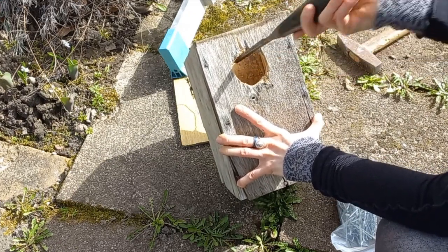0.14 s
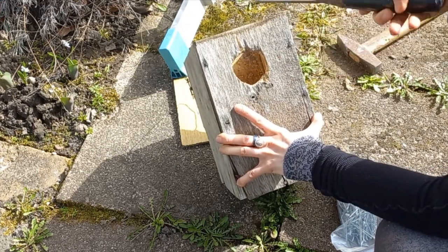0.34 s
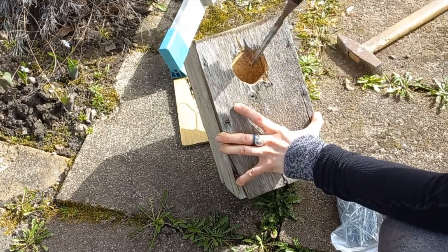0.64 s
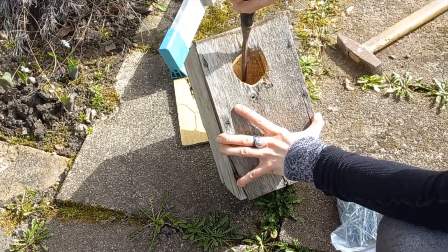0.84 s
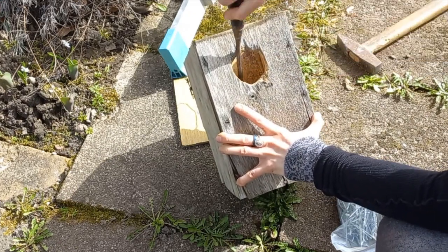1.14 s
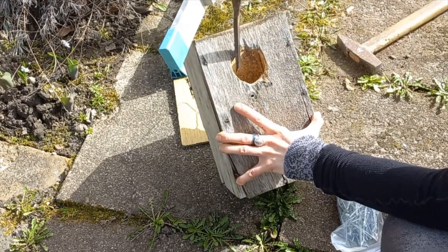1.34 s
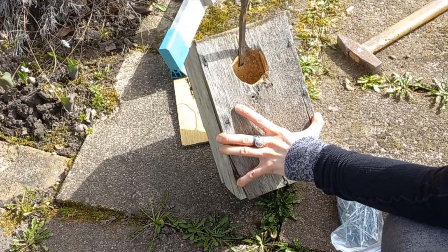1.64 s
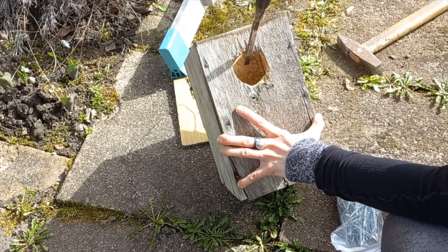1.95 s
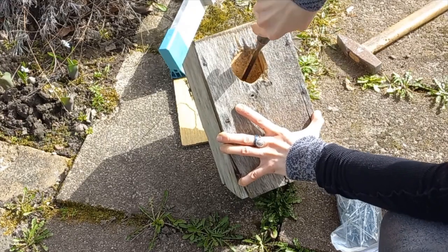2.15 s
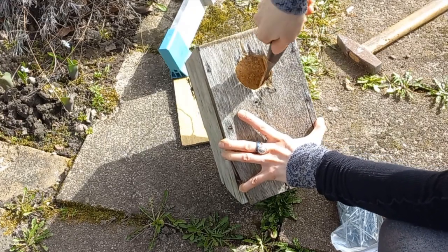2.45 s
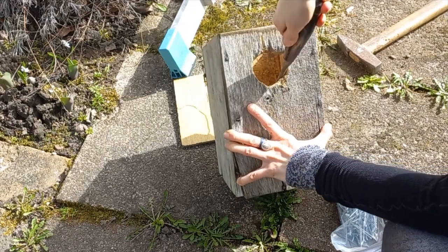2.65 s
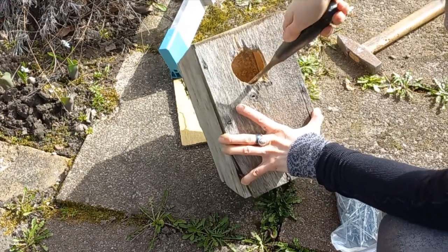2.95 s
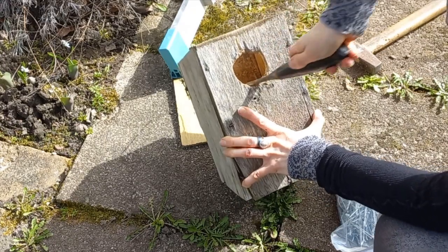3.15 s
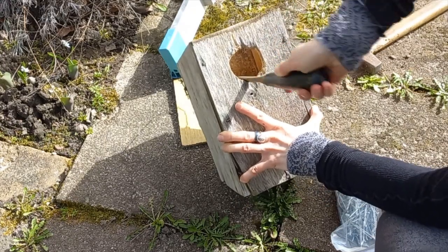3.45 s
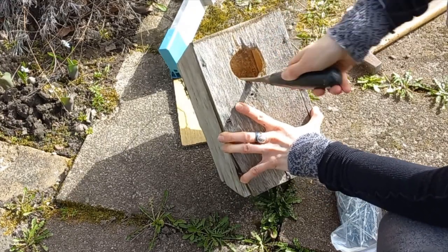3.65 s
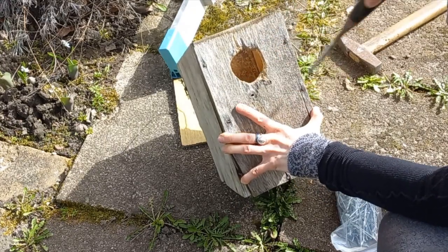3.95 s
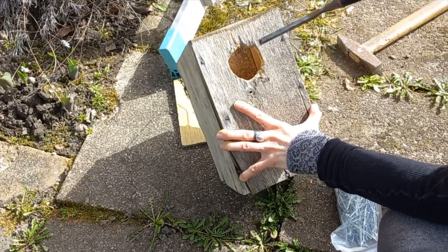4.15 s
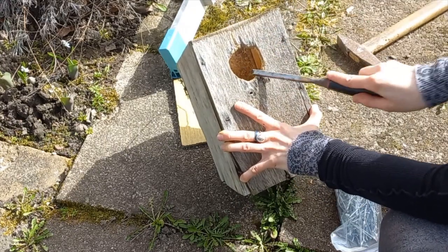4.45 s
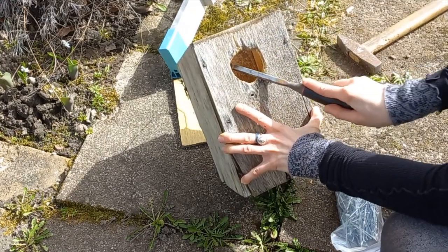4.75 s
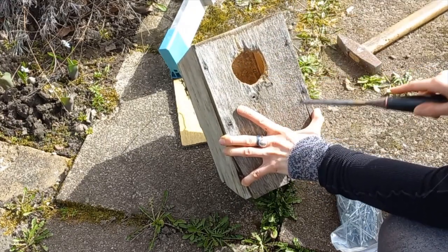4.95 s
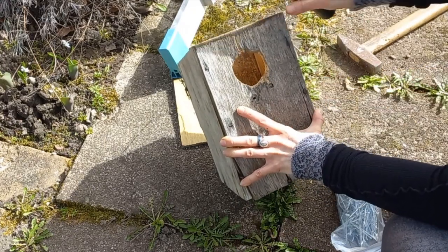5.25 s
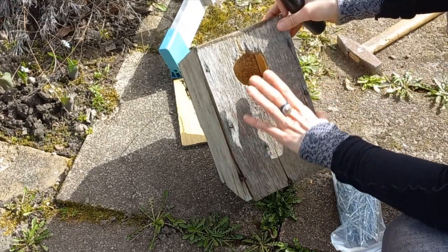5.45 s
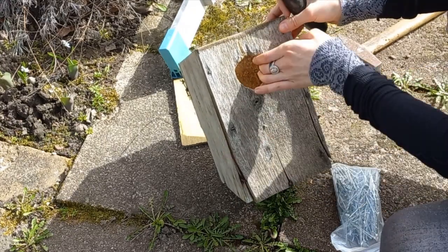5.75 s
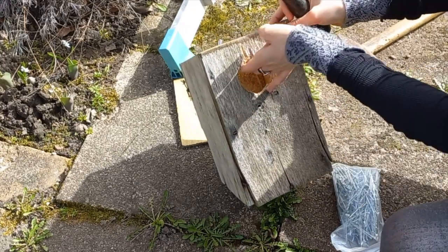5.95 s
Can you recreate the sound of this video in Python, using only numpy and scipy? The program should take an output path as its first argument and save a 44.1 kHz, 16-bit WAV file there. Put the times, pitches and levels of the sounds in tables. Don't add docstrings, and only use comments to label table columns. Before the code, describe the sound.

Close up, a metal file scrapes around the hole of a hollow wooden box in rapid, uneven strokes, each a gritty rasp over a low woody resonance. Wind buffets the microphone early on while small birds chirp in the distance. Hard knocks and splinter cracks cluster just before three seconds. After a short gap, lighter strokes follow, then a double knock near five seconds, and finally faint finger rubs and a dry tick in quiet garden air.

```python
import sys
import numpy as np
from scipy import signal
from scipy.fft import rfft, irfft, next_fast_len
from scipy.io import wavfile
from scipy.ndimage import uniform_filter1d

SR = 44100
rng = np.random.default_rng(int(sys.argv[2]) if len(sys.argv) > 2 else 0)


def unload_audio(sound):
    columns = np.transpose(np.atleast_2d(sound))
    steps = np.round(np.clip(columns, -1, 1) * 32767)
    wavfile.write(sys.argv[1], SR, steps.astype(np.int16))


def gain_from_db(level_db):
    decades = np.asarray(level_db, float) / 20
    return 10 ** decades


N = 268613
PADDED = next_fast_len(N)
FREQS = np.maximum(np.fft.rfftfreq(PADDED, 1 / SR), 1)

# start_s, length_s, hiss_db, boom_db, panel_db
STROKES = [(-.01, 0.13, -55.5, -28, -43.5), (0.057, 0.17, -62, -38, -45), (0.2, 0.09, -73, -58, -69),
           (0.215, 0.51, -84.5, -57.5, -96.5), (0.613, 0.092, -71.5, -50, -69),
           (0.787, 0.17, -63.5, -32.5, -48.5), (1.006, 0.14, -57.5, -52, -54.5),
           (1.175, 0.14, -65, -54, -59.5), (1.328, 0.16, -57.5, -38.5, -53.5),
           (1.485, 0.15, -59.5, -39, -44), (1.653, 0.15, -58, -26.5, -38.5),
           (1.8, 0.15, -58, -32.5, -40), (2.006, 0.12, -61.5, -30, -42), (2.134, 0.16, -62, -36.5, -52),
           (2.312, 0.16, -61, -34.5, -42.5), (2.469, 0.032, -65, -46.5, -50.5),
           (2.5, 0.072, -78.5, -62.5, -69),
           (2.642, 0.12, -59, -44, -48), (2.73, 0.16, -55, -27, -34), (2.898, 0.076, -71.5, -53, -63),
                (2.961, 0.1, -60, -52, -44.5), (3.063, 0.16, -54.5, -42, -42.5),
                (3.252, 0.12, -61.5, -48, -54), (3.337, 0.04, -53.5, -40, -40.5),
                (3.383, 0.14, -54.5, -37.5, -36.5), (3.55, 0.15, -53.5, -41, -38),
                (3.712, 0.064, -54.5, -43.5, -40), (3.763, 0.092, -59.5, -45.5, -40),
                (3.834, 0.077, -57, -39.5, -39.5), (4.267, 0.07, -66.5, -52, -48.5),
                (4.326, 0.087, -67.5, -54, -54), (4.423, 0.1, -60.5, -42.5, -43),
                (4.543, 0.13, -60, -47, -54), (4.679, 0.1, -59, -42, -45.5),
                (4.808, 0.14, -56.5, -38.5, -43)]
# start_s, length_s, hiss_db, boom_db, panel_db
BRUSHES = [
    (5.333, 0.071, -85, -78.5, -74),
    (5.545, .03, -72.5, -70, -83.5),
    (5.574, 0.16, -76, -92, -78),
    (5.769, 0.2, -84, -98.5, -89),
]
# freq_hz, level_db, t60_s,
# shape_db (gained as the contact moves round the hole)
BOX_MODES = [(221, -18, 0.3, 6.5), (333, -26, 0.12, -7), (326, -8, 0.15, -3), (375, 4, 0.047, 4),
             (394.4, -11.5, 0.26, 9), (431.2, -3.5, 0.12, -0.5), (505, -9, 0.051, 1.5),
             (509, -12.5, 0.093, 0.5)]
PANEL_MODES = [(700, -3, 0.082, -7.5), (858.6, 5, 0.048, -6), (977.5, 3, 0.061, 1.5),
               (1032, 0.5, 0.018, 14.5), (1207, -5.5, 0.018, 6), (1396, -3.5, 0.088, 6),
               (1526, -11, 0.087, 3), (1631, 0.5, 0.027, 2.5), (1813, -15.5, 0.03, 15),
               (1920, -7.5, 0.0081, 15), (2114, -16, 0.016, 15)]
BLADE_MODES = [(2710, 2, 0.005, 5), (2840, 2, 0.032, 6), (3557, -6.5, .02, -20), (4150, 6.5, 0.012, -14),
               (5050, 3, 0.06, -4), (5245, 8, 0.045, -3), (5170, -10, 0.011, 5.5), (6600, -22, 0.03, 1),
               (7760, -9, .011, -0.5), (12000, -3.5, 0.00074, 6.5), (14930, -13, 0.009, -3)]
# freq_hz, density_db (per Hz)
TEETH_SPECTRUM = [(1180, -60.5), (2000, -6.5), (2340, -7), (2780, -2), (3740, 7), (5250, 2.5), (5780, 3.5),
                  (11900, -2.5), (16000, -6.5)]
STROKE_SHAPE = 0.43, 1.87
HISS_SHAPE = 0.62, 3.6
HISS_ENDS_DB, BOOM_ENDS_DB, PANEL_ENDS_DB, BLADE_ENDS_DB = 15, 15.5, 20, 23
BLADE_FROM_PANEL, BLADE_DB = 0.43, -8
LINGER_DB, LINGER_T60_S = -18.5, 1
TRAIL_DB, TRAIL_T60_S = -17.5, 0.2
GRAIN_HZ, GRAIN_DB = (700, 2700), -11
SPARKLE_HZ = 6950


def strokes():
    s, length, hiss_db, boom_db, panel_db = np.transpose(STROKES + BRUSHES)
    blade_db = BLADE_DB + BLADE_FROM_PANEL * panel_db + (1 - BLADE_FROM_PANEL) * hiss_db

    boom = swells(zip(s, length, boom_db), BOOM_ENDS_DB, *STROKE_SHAPE)
    panel = swells(zip(s, length, panel_db), PANEL_ENDS_DB, *STROKE_SHAPE)
    blade = swells(zip(s, length, blade_db), BLADE_ENDS_DB, *HISS_SHAPE)
    hiss = swells(zip(s, length, hiss_db), HISS_ENDS_DB, *HISS_SHAPE)
    sparkle = swells(zip(s, length, hiss_db), HISS_ENDS_DB + 1.5, *HISS_SHAPE)
    boom = trailing(boom, LINGER_DB, LINGER_T60_S)
    levels = np.array([panel, blade, hiss, sparkle])
    panel, blade, hiss, sparkle = trailing(levels, TRAIL_DB, TRAIL_T60_S)

    coarse = bites(1500, spread_db=2.0)
    fine = bites(5000, spread_db=3.0) * gain_from_db(1.6 * drift(45))
    box_ring = evened(body(coarse, BOX_MODES[1:], wander_db=7.0), 0.053, 0.22)
    panel_ring = evened(body(coarse + 0.63 * fine, PANEL_MODES, wander_db=4.5), 0.053, 1.0)
    blade_ring = gain_from_db(3.5) * evened(body(fine, BLADE_MODES, wander_db=1.2), 0.2, 0.3)
    grain_band = signal.butter(2, GRAIN_HZ, "band", fs=SR, output="sos")
    grain = gain_from_db(GRAIN_DB) * rms_one(signal.sosfilt(grain_band, coarse + fine))

    teeth = gain_from_db(2.5) * patchy(coloured(fine, TEETH_SPECTRUM))
    treble = signal.butter(2, SPARKLE_HZ, "high", fs=SR, output="sos")
    top = signal.sosfiltfilt(treble, teeth)
    out = boom * box_ring + panel * (panel_ring + grain) + blade * blade_ring
    return out + hiss * (teeth - top) + sparkle * top


def bites(per_s, spread_db):
    sizes = gain_from_db(spread_db * np.minimum(rng.exponential(1, N), 4)) * rng.choice([-1, 1], N)
    return sizes * (rng.random(N) < per_s / SR)


def ring(clicks, hz, t60):
    t60 = min(t60, 110 / hz)
    radius = gain_from_db(-60 / (t60 * SR))
    angle = 2 * np.pi * hz / SR
    poles = [1, -2 * radius * np.cos(angle), radius * radius]
    return signal.lfilter([0, np.sin(angle)], poles, clicks + 1e-18)


def body(clicks, modes, wander_db):
    travel, where = [drift(2.71) for _ in range(4)], place()
    out = np.zeros(N)
    for k, (hz, db, t60, shape_db) in enumerate(modes):
        force = gain_from_db(db + shape_db * where + wander_db * travel[k % 4])
        out += (-1) ** k * ring(clicks * force, hz, t60)
    return out


# time_s, place (-1 to 1)
PLACE = [(0, -0.76), (.6, -0.18), (1.3, -0.38), (1.9, -0.61), (2.299, -0.17), (2.7, 0.68), (3.1, 0.68),
         (3.499, 0.81), (3.899, 0.68), (4.3, 0.37), (4.6, 0.69), (4.9, 0.59), (6.09, 0.55)]


def place():
    return np.interp(np.arange(N) / SR, *np.transpose(PLACE))


def patchy(x):
    edges = np.geomspace(1500, 18000, num=7)
    out = x.copy()
    for pair in zip(edges, edges[1:]):
        band = signal.lfilter(*signal.butter(1, pair, "band", fs=SR), x)
        out += 0.5 * band * drift(10)
    return rms_one(out)


# time_s, peak_db, thud_db, panel_db, upper_panel_db (shares)
KNOCKS = [(0.022, -16.5, -6, -22, -21), (0.209, -34, -32, 11, 11.5), (0.610, -15.5, -14, -19, -18.5),
          (0.796, -11, -20, -27, -19), (0.82, -11, -5.5, -1.5, 1), (0.85, -17.5, -1, -6, -17),
          (1.543, -17, 0, -9, -5), (1.846, -16.5, -15, -2.5, -9), (2.044, -13, -30, -3.5, 2),
          (2.739, -16, -21.5, -6, -14), (2.769, -4.5, -20, 3.5, 3), (2.778, -16, -18, -3, 4.5),
          (2.796, -5.5, -8.5, 1, -4), (2.805, -18, -16, -2.5, 0), (2.860, -12, -23, 3, 4.5),
          (3.031, -15, -17.5, -10, -9.5), (3.687, -7.5, -12.5, -9.5, -9.5), (4.264, -18.5, -8, 2, -4),
          (4.279, -19.5, -11.5, -4, -5), (4.291, -22, -15, 2, -18), (4.311, -24, -7, 1.5, -12.5),
          (4.361, -19, -8, -4, -15), (4.893, -17, -5.5, -4, -4), (4.916, -17, -5, 2, 0.5)]
# time_s, peak_db, panel_db (share)
SNAGS = [(0.879, -18, -13), (0.905, -26, 0.5), (1.02, -22, -23), (1.384, -33, -15), (1.407, -21, -11),
         (1.427, -14.5, -20), (1.524, -24, -22), (1.66, -32, -4), (1.677, -30, -15), (1.712, -25, -12),
         (1.73, -5, -13), (1.745, -7, -7), (1.754, -7, -8), (1.765, -14, -5), (1.831, -14, -20),
         (1.866, -20, -1), (1.933, -25, -4.5), (2.02, -30, 0), (2.077, -17, -7.5), (2.09, -31, 3),
         (2.19, -17.5, -25), (2.351, -23, -10), (2.376, -25, -1), (2.391, -13.5, -12), (2.425, -29, 0),
         (2.469, -23.5, -26), (2.676, -30, -12), (2.685, -24, -5), (2.713, -25, -12), (2.817, -20, -15),
         (2.886, -33, 2), (2.994, -18, -14.5), (3.012, -31, -4), (3.08, -15, -10.5), (3.122, -24.5, -25),
         (3.266, -28.5, -19), (3.296, -32, -11), (3.327, -18, -31), (3.349, -18, -12), (3.361, -22.5, -8),
         (3.398, -20.5, -7), (3.413, -16.5, -6.5), (3.425, -29.5, -4), (3.567, -29.5, 2), (3.627, -14, -12),
         (3.727, -19.5, -8), (3.745, -20.5, -4), (3.85, -25.5, 1.5), (3.87, -23, -5), (4.461, -43.5, 19),
         (4.606, -44, 2), (4.72, -30, -19), (4.883, -26, -12)]
# time_s, level_db
SNAPS = [(0.206, -42), (2.469, -49), (2.74, -44), (2.771, -33), (2.799, -29.5), (2.861, -40),
         (3.627, -43.5), (3.642, -36.5), (3.851, -45.5), (3.895, -42), (3.695, -44), (4.265, -49),
         (4.279, -54.5), (4.292, -52.5), (4.362, -54), (4.891, -38.5), (4.917, -40)]
SNAG_THUD_DB = -25
KNOCK_RISE_S, SNAG_RISE_S = 0.002, 0.007
CRACK_DB, CRACK_PER_PEAK_DB, CRACK_PER_PANEL_DB = -38, 2, -1.3
BOX_DAMPING, PANEL_DAMPING = 0.64, 0.78


def knocks():
    drags = [(s, db, SNAG_THUD_DB, edge_db, edge_db) for s, db, edge_db in SNAGS]
    s, peak_db, thud_db, panel_db, upper_db = np.transpose(KNOCKS + drags)
    at = (s * SR).astype(int)
    hard = np.arange(len(s)) < len(KNOCKS)
    t = np.arange(SR // 50) / SR
    rise_s = np.where(hard, KNOCK_RISE_S, SNAG_RISE_S)[:, None]
    rise = np.sin(np.pi * np.minimum(t / rise_s, 1)) ** 2

    modes = BOX_MODES + PANEL_MODES
    chance = rng.normal(0, 1, (len(at), len(modes)))
    judder = 0.12 * bites(1200, spread_db=1.5)
    where = place()[at]
    out = np.zeros(N)
    for k, (hz, db, t60, shape_db) in enumerate(modes):
        if hz < 260:
            share_db = thud_db + 12.5
        elif hz < 600:
            share_db = -8
        elif hz < 1100:
            share_db = panel_db - 17.0
        else:
            share_db = upper_db - 17.5
        force = gain_from_db(peak_db + db + share_db + shape_db * where + 3.74 * chance[:, k]) / rise.sum(axis=1)
        pulses = 2 * force[:, None] * rise * np.cos(2 * np.pi * hz * t)
        clicks = np.zeros(N)
        np.add.at(clicks, at[:, None] + np.arange(len(t)), pulses)
        clicks += judder * signal.lfilter([1], [1, -gain_from_db(-60 / (0.04 * SR))], clicks)
        damping = BOX_DAMPING if hz < 600 else PANEL_DAMPING
        out += (-1) ** k * ring(clicks, hz, t60 * damping)
    out = signal.lfilter(*signal.butter(1, [190, 2600], "band", fs=SR), out)
    crack_db = CRACK_DB + CRACK_PER_PEAK_DB * peak_db + CRACK_PER_PANEL_DB * upper_db - 6.0 * ~hard
    return out + cracks(at, crack_db)


def cracks(at, crack_db):
    burst = np.zeros(N)
    burst[at] = gain_from_db(crack_db)
    burst[[round(s * SR) for s, db in SNAPS]] += gain_from_db([db for s, db in SNAPS])
    dying = signal.lfilter([1], [1, -gain_from_db(-60 / (0.0063 * SR))], burst)
    noise = coloured(rng.standard_normal(N), TEETH_SPECTRUM)
    return dying * noise + 0.27 * body(burst, BLADE_MODES, wander_db=3.0)


# start_s, length_s, freq_hz, level_db
SQUEALS = [(1.337, 0.11, 14800, -62), (1.74, .03, 336, -19.5), (1.744, 0.019, 940, -32.5),
           (.02, .04, 400.7, -29), (.08, .1, 860, -43.5), (1.66, .1, 4400, -62.5), (2.02, .08, 5200, -62),
           (2.17, .07, 5250, -61.5), (2.77, .02, 5340, -52.5), (2.797, .01, 5370, -47),
           (2.81, .025, 407, -20), (1.836, 0.023, 1610, -39.5), (2.18, 0.068, 2960, -64),
           (2.365, 0.069, 2300, -49.5), (2.798, 0.007, 2800, -44.5), (3.09, 0.17, 7900, -63),
           (3.103, .1, 12000, -67), (3.34, 0.038, 12000, -68), (3.384, .11, 7800, -56.5),
           (3.392, 0.14, 12000, -66.5), (3.394, .09, 14600, -68.5), (3.42, .06, 2800, -58),
           (3.603, 0.037, 3200, -56), (3.735, .025, 1600, -36), (3.779, 0.058, 1010, -40),
           (3.823, 0.03, 1690, -47), (3.855, 0.027, 5130, -55), (4.297, .03, 1385, -45),
           (4.43, 0.11, 12000, -65), (4.563, .07, 12000, -60.5), (4.688, .07, 12000, -60.5),
           (4.696, .06, 2700, -62), (4.263, .06, 2480, -57), (4.915, .01, 4360, -48),
           (4.92, .03, 1380, -44.5), (4.7, .07, 1390, -51.5), (4.58, .06, 426, -47), (3.0, .04, 1610, -47),
           (3.1, .06, 1570, -48.5), (3.335, .035, 1850, -47.5), (3.4, .08, 1790, -49),
           (3.09, .08, 5300, -56), (3.56, .1, 12000, -66.5), (3.56, .1, 7740, -64.5),
           (3.79, .1, 12000, -65.5), (3.79, .1, 7710, -66.5)]
SQUEAL_CYCLES = 44


def squeals():
    out = np.zeros(N)
    for s, length, hz, db in SQUEALS:
        noise = rms_one(ring(rng.standard_normal(SR // 4), hz, SQUEAL_CYCLES / hz))
        noise = noise[-round(length * SR):]
        out[round(s * SR):][:len(noise)] += gain_from_db(db) * np.hanning(len(noise)) ** 0.25 * noise
    return out


# time_s, peak_db, freq_hz, t60_s
TICKS = [(5.376, -56.5, 8900, 0.005), (5.37, -62.5, 1402, 0.092), (5.378, -62, 5970, .002),
         (5.378, -62, 14200, 0.0019), (5.558, -35.5, 8000, 0.0028), (5.558, -51, 6290, 0.0027),
         (5.558, -51, 14500, 0.0019), (5.558, -50, 12300, 0.0028), (5.61, -70.5, 3300, .01),
         (5.647, -66.5, 10430, .002), (5.687, -63, 970, .04), (5.955, -67, 700, 0.066)]


def ticks():
    out = np.zeros(N)
    for s, db, hz, t60 in TICKS:
        touch = gain_from_db(db) * signal.unit_impulse(N, round(s * SR))
        out += signal.lfilter(*signal.butter(2, hz / 2, "high", fs=SR), ring(touch, hz, t60))
    return out


# freq_hz, side_db (side minus mid)
WIDTH = [(60, -12), (110, -23.5), (200, -8.5), (380, -2.5), (700, -13), (1290, -11), (2380, -2),
         (4400, 0.5), (8120, 5.5), (15000, 6.5)]


def ports(x):
    scattered = np.roll(x, 12) * (0.2 + drift(300))
    skew = 0.7j * rfft(x, PADDED) * FREQS / (FREQS + 1500)
    side = irfft((rfft(scattered, PADDED) + skew) * gain_from_db(on_freqs(WIDTH) - 5.5), PADDED)[:N]
    return x + side * [[1], [-1]]


# start_s, length_s, level_db
CHIRPS = [
    (0.632, 0.021, -57.5),
    (0.724, 0.016, -53.5),
    (0.806, 0.013, -52),
    (0.887, 0.019, -51.5),
    (0.979, 0.015, -59),
    (1.065, 0.014, -62),
    (1.17, .01, -59),
    (1.239, 0.012, -60),
]
# start_s, length_s, start_hz, end_hz, level_db
NOTES = [(0.608, 0.024, 6360, 6250, -64), (0.653, 0.011, 4830, 5000, -58), (0.715, 0.029, 6500, 5940, -65),
         (1.008, 0.025, 4230, 4150, -63), (1.137, 0.032, 6400, 5980, -66), (1.313, 0.065, 3740, 3380, -64),
         (1.39, 0.015, 4120, 4170, -55), (1.424, 0.0096, 3980, 4150, -51), (4.033, 0.13, 7440, 7110, -81),
         (5.479, 0.046, 5250, 4970, -81), (5.507, 0.061, 4980, 5120, -75.5),
         (5.57, 0.12, 5140, 5170, -80.5), (5.78, 0.071, 7760, 7500, -80)]
CHIRP_HZ, CHIRP_FALL_HZ_PER_S, CHIRP_WAVER_HZ = 4810, 43000, 173
WAVER_HZ, WAVER_POWER = 34.66, 6


def birds():
    voices = []
    for s, length, db in CHIRPS:
        end_hz = CHIRP_HZ - CHIRP_FALL_HZ_PER_S * length
        voices.append((s, length, CHIRP_HZ, end_hz, db, CHIRP_WAVER_HZ))
    for s, length, start_hz, end_hz, db in NOTES:
        voices.append((s, length, start_hz, end_hz, db, WAVER_HZ * (start_hz / 5000) ** WAVER_POWER))

    song, waver = np.zeros(N), drift(270)
    for s, length, start_hz, end_hz, db, waver_hz in voices:
        start = round(s * SR)
        hz = np.linspace(start_hz, end_hz, round(length * SR))
        hz = hz + waver_hz * waver[start:][:len(hz)]
        whistle = np.sin(2 * np.pi * np.cumsum(hz) / SR)
        song[start:][:len(hz)] += gain_from_db(db + 5.0) * np.hanning(len(hz)) ** 0.24 * whistle
    t = np.arange(SR // 2) / SR
    echoes = rng.standard_normal((2, len(t))) * gain_from_db(-60 * t / 0.5 - 33.0)
    return song + signal.fftconvolve(song[None], echoes)[:, :N]


# time_s, level_db
CHATTER = [
    (0.595, -83),
    (0.625, -62.5),
    (0.656, -77),
    (0.776, -73.5),
    (0.82, -67),
    (0.94, -71.5),
    (1.452, -73.5),
    (1.7, -80.5),
]
# start_s, length_s, level_db
CROAKS = [
    (.475, .04, -71.5),
    (.55, 0.068, -63.5),
]


def flock():
    high_band = signal.butter(4, [3300, 6800], "band", fs=SR, output="sos")
    high = rms_one(signal.sosfilt(high_band, rng.standard_normal((2, N))))
    low_band = signal.butter(2, [1900, 2800], "band", fs=SR, output="sos")
    hoarse = rms_one(signal.sosfilt(low_band, rng.standard_normal((2, N))))
    chatter = in_time(CHATTER) * gain_from_db(12.0 + 1.8 * drift(25)) * high
    return chatter + swells(CROAKS, 8.6, *STROKE_SHAPE) * hoarse


# time_s, level_db
BREEZE = [(0.0, -46), (0.5, -44), (0.7, -63), (1.1, -68), (1.9, -52), (2.0, -73), (2.3, -62), (2.47, -48),
          (2.66, -71), (2.81, -52), (3.26, -64.5), (3.9, -66.5), (4.0, -82), (4.21, -77), (4.3, -57),
          (4.95, -81), (5.34, -72.5), (6.09, -69)]
# freq_hz, density_db (per Hz)
WIND_SPECTRUM = [(12, -61.5), (20, -22.5), (32, -28), (54, -5), (109, 1.5), (333, -22), (552, -40.5),
                 (700, -55.5), (910, -74), (1540, -120)]
# centre_s, length_s, level_db
GUSTS = [(0.041, 0.097, -27), (0.107, 0.048, -31), (0.191, 0.066, -27.5), (0.293, 0.042, -19.5),
         (0.356, 0.076, -29.5), (0.474, 0.028, -28), (0.519, 0.041, -31), (0.648, 0.061, -47),
         (0.82, 0.11, -39), (0.896, 0.08, -38), (1.069, 0.22, -45), (1.132, 0.017, -40),
         (1.218, 0.062, -37.5), (1.288, 0.023, -29.5), (1.342, 0.17, -38.5), (1.528, 0.076, -34.5),
         (1.556, 0.074, -33), (1.653, 0.047, -37), (1.729, 0.06, -35.5), (1.81, 0.072, -32),
         (1.892, 0.061, -34.5), (2.11, 0.14, -51.5), (2.473, 0.044, -50), (3.11, 0.11, -66),
         (3.72, 0.019, -51), (3.896, 0.04, -51), (4.505, 0.086, -37.5), (4.917, 0.39, -53.5),
         (5.706, 0.047, -60), (5.777, 0.057, -63), (5.871, 0.045, -63)]
GUST_ENDS_DB, GUST_SHAPE = 18.5, (0.35, 1.36)


def wind():
    shared, left, right = (coloured(rng.standard_normal(N), WIND_SPECTRUM) for _ in range(3))
    pair = np.array([evened(0.2 * shared + own, 0.04, 0.27) for own in (left, right)])
    veer_db = np.interp(np.arange(N) / SR, [4.8, 5.3], [0, 2.5]) * [[1], [-1]]
    gusts = [(s - length / 2, length, db) for s, length, db in GUSTS]
    level = in_time(BREEZE) + swells(gusts, GUST_ENDS_DB, *GUST_SHAPE)
    return level * gain_from_db([[3.5], [2.5]] + veer_db) * pair


# freq_hz, density_db (per Hz)
AIR_SPECTRUM = [(100, -41), (170, -36.5), (235, -18.5), (290, 3), (721, -4), (1250, -7.5), (5840, -19.5),
                (7480, -14), (9390, -19), (12500, -12), (16000, -17)]
AIR_DB = -68


def garden_air():
    pair = [coloured(rng.standard_normal(N), AIR_SPECTRUM) for _ in range(2)]
    return gain_from_db(AIR_DB - 3.5) * np.array(pair)


def rms_one(x):
    return x / np.sqrt(np.mean(x ** 2) + 1e-20)


def in_time(rows, silence_db=-110):
    s, db = np.transpose(rows)
    return gain_from_db(np.interp(np.arange(N) / SR, s, db, silence_db, silence_db))


def on_freqs(points):
    hz, db = np.transpose(points)
    return np.interp(np.log(FREQS), np.log(np.maximum(hz, 1)), db)


def coloured(x, spectrum):
    return rms_one(irfft(rfft(x, PADDED) * gain_from_db(on_freqs(spectrum)), PADDED)[:N])


def drift(rate_hz):
    low = signal.butter(2, rate_hz, fs=SR, output="sos")
    slow = signal.sosfilt(low, rng.standard_normal(N + SR))
    return rms_one(slow[SR:])


def trailing(level, tail_db, t60):
    fade = gain_from_db(-60 / (t60 * SR))
    return level + gain_from_db(tail_db) * signal.lfilter([1 - fade], [1, -fade], level)


def evened(x, span_s, share):
    level = np.sqrt(uniform_filter1d(x ** 2, round(span_s * SR)).clip(1e-12))
    return rms_one(x / level ** np.clip(share, 0, 1))


def swells(rows, ends_db, peak_at, squareness):
    out = np.zeros(N)
    for s, length, db in rows:
        at = np.arange(max(0, round((s - length) * SR)), min(N, round((s + 2 * length) * SR)))
        along = (at / SR - s) / length - peak_at
        reach = np.where(along < 0, peak_at, 1 - peak_at)
        out[at] += gain_from_db(db - ends_db * np.abs(along / reach) ** squareness)
    return out


def scene():
    radiation = signal.butter(4, 170, "high", fs=SR, output="sos")
    box = signal.sosfilt(radiation, strokes() + knocks() + squeals() + ticks())
    return ports(box) + birds() + flock() + wind() + garden_air()


def top_cut(x):
    return signal.sosfilt(signal.butter(12, 16350, fs=SR, output="sos"), x)


def record(dry):
    mix = irfft(rfft(dry, PADDED) * (FREQS < 15860), PADDED)[:, :N]
    return top_cut(mix)


dry = scene()
out = record(dry)
unload_audio(out)
```